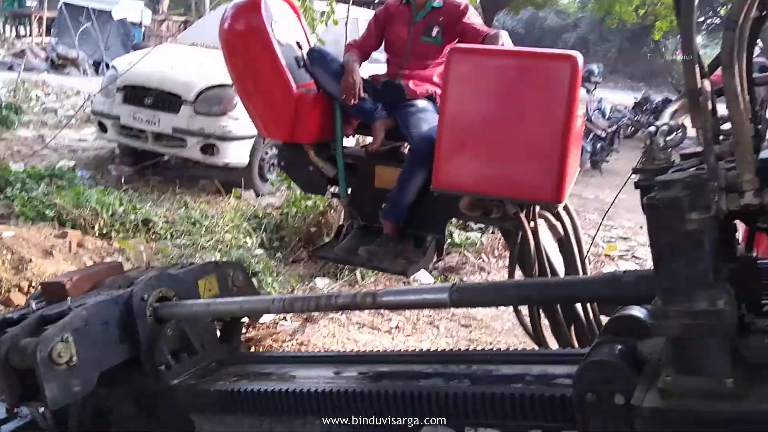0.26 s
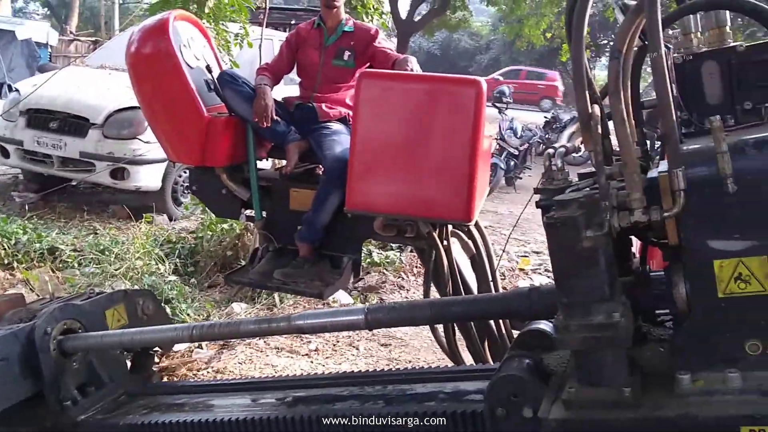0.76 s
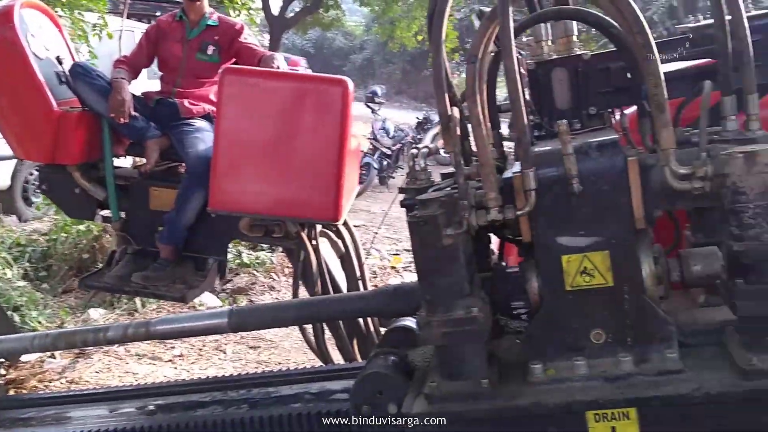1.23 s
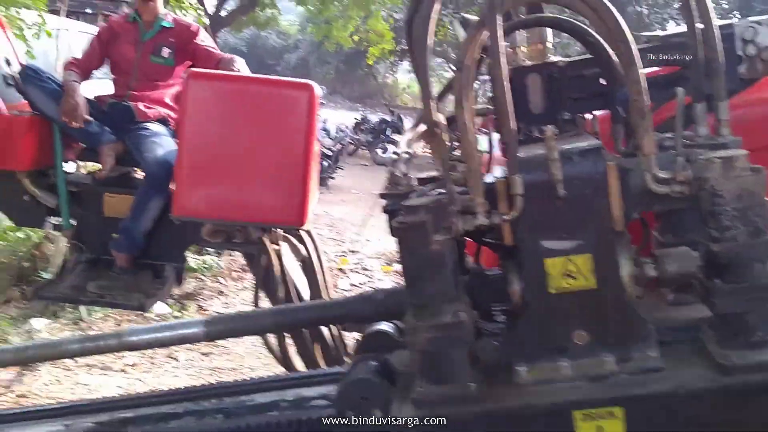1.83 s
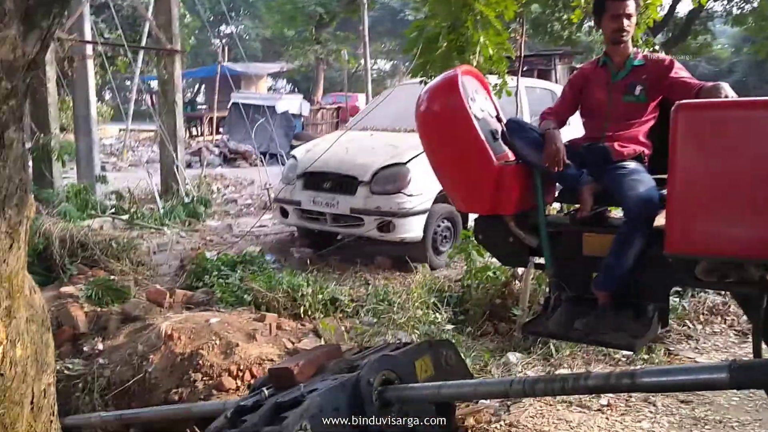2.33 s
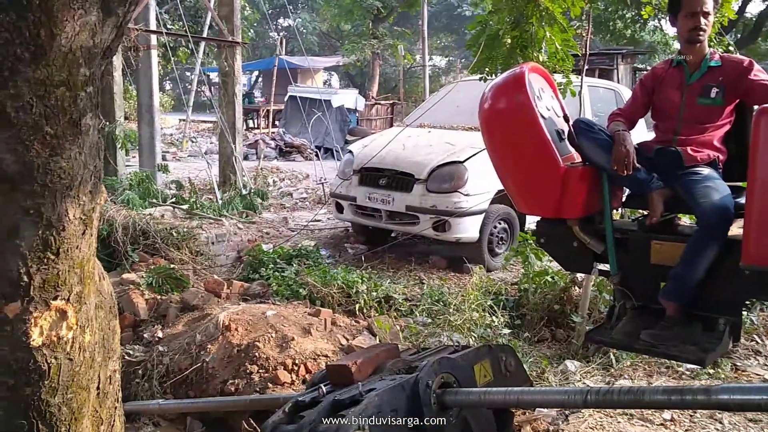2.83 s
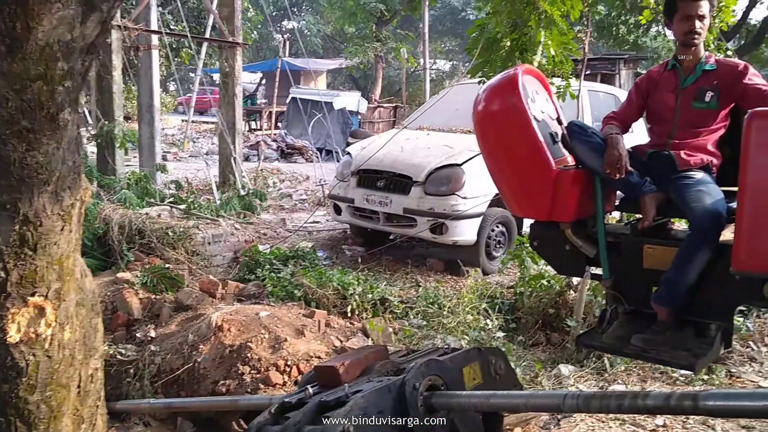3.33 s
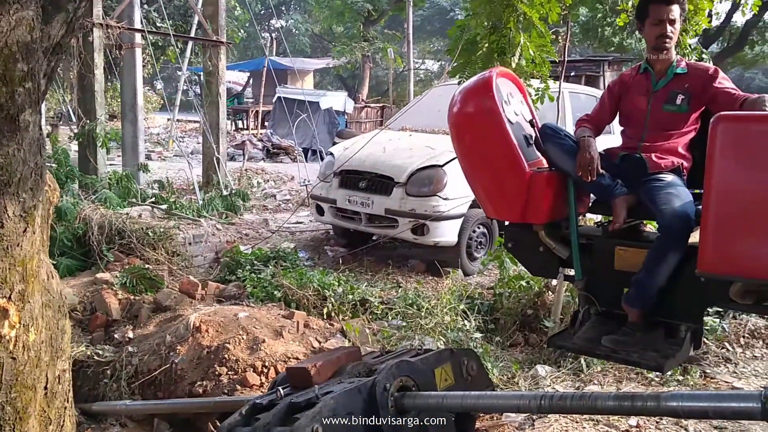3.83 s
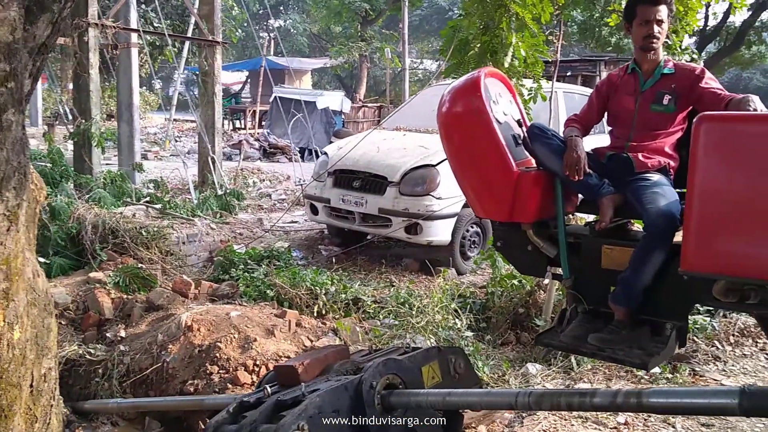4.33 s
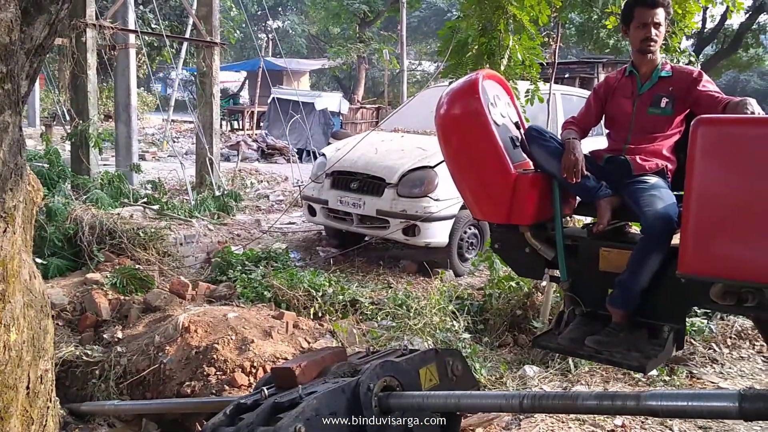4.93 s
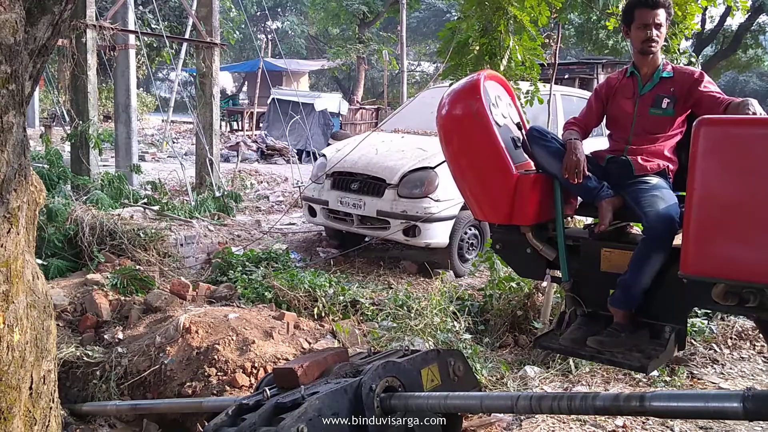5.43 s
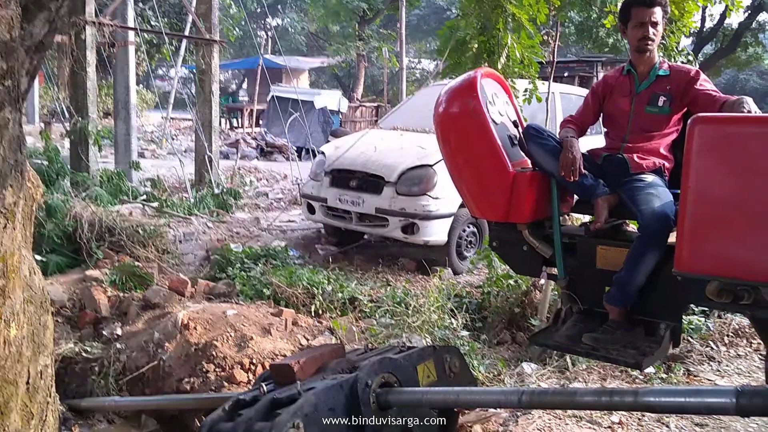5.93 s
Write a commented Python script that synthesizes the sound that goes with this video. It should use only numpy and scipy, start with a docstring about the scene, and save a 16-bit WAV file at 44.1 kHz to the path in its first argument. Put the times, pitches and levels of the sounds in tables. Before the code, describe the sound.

From 0 seconds a diesel drilling rig is running hard, close by and outdoors, and it continues without a break to about 6.2 seconds. A deep, fast-throbbing exhaust roar with uneven dips and swells carries low rumble and hydraulic pump hum. Above it are dense engine-block clatter, broad fluttering fan hiss and a thin gear whine that wavers roughly once a second. Loose steel rattles near 0.3 and 0.85 seconds. At about 2.0 to 2.3 seconds the handheld stereo microphone swings away, making the roar a little softer and shifting the hiss and whine in colour. Metallic buzzing and jolts gather around 2.7 to 3.3, then at 3.7 and 3.9 seconds. Rough growls surge around 3.4 to 4.1, with the roar dipping between them. Lighter rattles follow at 5.2, a tiny knock at 5.7, and clatter and hiss strengthen slightly towards the end.

```python
"""Outdoors, close to a diesel drilling rig under load: noise shaped into exhaust roar, rumble, growl, block
clatter and fan hiss; sines for exhaust orders, a hydraulic pump hum and a gear whine that wavers with each turn
of the drill pipe; noise through resonances for loose steel rattling. A handheld camera with two microphone
ports faces the engine for about two seconds, then swings away for the rest; it subtracts each port, delayed,
from the other for width."""
import sys
import numpy as np
from scipy import signal
from scipy.fft import rfft, irfft, next_fast_len
from scipy.io import wavfile
from scipy.ndimage import uniform_filter1d, map_coordinates

SR = 44100
rng = np.random.default_rng(int(sys.argv[2]) if len(sys.argv) > 2 else 0)


def invert_db(level):
    """Linear amplitude ratio for a level in decibels (20 dB per decade), elementwise."""
    return 10 ** (np.asarray(level, dtype=float) / 20)


def transcribe(u):
    """Save the signal u as a 16-bit wav file named by the first command-line argument.

    u: samples, shape (n,) or (channels, n), limited to [-1, 1]; the rate is SR.
    q: integer samples, one column per channel.
    """
    v = np.clip(np.atleast_2d(u).T, -1, 1)
    q = np.round(v * 32767).astype(np.int16)
    wavfile.write(sys.argv[1], SR, q)


N = 272097  # length in samples

FIRING_HZ = 77.0  # mean firing rate of the engine
# Brief dips and swells of the roar. Each row: centre in seconds, change in dB, half length in seconds.
ROAR_LUMPS = [(0.13, -8.5, 0.075), (.26, 2, 0.4), (0.311, -12, 0.031), (0.64, 3, 0.11), (1.394, 4, 0.078),
              (1.515, -8, 0.13), (1.593, 6, 0.075), (1.706, -8, 0.082), (2.47, 3, 0.091), (2.98, -5, 0.11),
              (3.475, 8.5, 0.049), (3.58, -13, 0.13), (3.69, 3.5, 0.03), (3.862, -10, 0.044),
              (4.437, -5, 0.35), (4.613, 6.5, 0.1), (5.09, 2, 0.19), (5.41, -13, 0.041), (5.727, -7, 0.036)]
# Slow strain on the machine. Each row: time in seconds, change of block clatter in dB, change of hiss in dB.
MACHINE_STRAIN = [(0, -0.5, 0.5), (.7, -0.5, 0.5), (1.5, 0.5, -2.5), (2.2, 0, 0), (2.7, -1.5, -0.5),
                  (3.3, 0, 2), (3.7, -1, -0.5), (4, 1, 1), (5, 1, 1), (6.17, 2.5, 1.5)]


def unit(x):
    """Scaled to rms 1."""
    return x / np.sqrt(np.mean(x ** 2) + 1e-20)


def along(points, hz, axis=1):
    """One column of a table, interpolated over a log frequency axis."""
    table = np.transpose(points)
    return np.interp(np.log(hz + 1), np.log(table[0] + 1), table[axis])


def curves(rows):
    """One value per sample for each column after the time."""
    s, *cols = np.transpose(rows)
    return [np.interp(np.arange(N) / SR, s, c) for c in cols]


def humps(table):
    """Sum of brief triangular changes of level, in dB."""
    t = np.arange(N) / SR
    return sum(db * np.clip(1 - abs(t - s) / half, 0, 1) for s, db, half in table)


def wobble(rate):
    """A smooth random curve with `rate` knots a second."""
    return map_coordinates(rng.standard_normal(int(N * rate / SR) + 4), [np.arange(N) * rate / SR])


def filtered(x, response):
    """x shaped by a complex response of frequency."""
    m = next_fast_len(N + 8192)
    return irfft(rfft(x, m) * response(np.fft.rfftfreq(m, 1 / SR)), m)[..., :N]


def delay(hz, ms):
    """Phase ramp of a lag."""
    return np.exp(-2j * np.pi * hz * ms / 1000)


def heading(facing, away):
    """Blends a quantity from its value facing the engine to its value turned away, as the camera swings."""
    # Each row: time in seconds, share turned away from 0 to 1.
    camera_swing = [(0, 0.27), (2.0, 0.13), (2.3, 0.91), (6.2, 0.96)]
    turn, = curves(camera_swing)
    return facing + turn * (away - facing)


def rush(spectrum, patchy_db):
    """Two unrelated noises with shared patches of gain, coloured for each camera heading."""
    z = signal.stft(rng.standard_normal((2, N)), nperseg=512)[2]
    field = rng.standard_normal(z.shape[1:])
    field = uniform_filter1d(field, size=4, axis=0)
    field = uniform_filter1d(field, size=8, axis=1)
    pair = signal.istft(z * invert_db(patchy_db * unit(field)), nperseg=512)[1][:, :N]
    facing = filtered(pair, lambda hz: invert_db(along(spectrum, hz)))
    away = filtered(pair, lambda hz: invert_db(along(spectrum, hz, axis=-1)))  # the last column
    return heading(unit(facing), unit(away))


def tones(cycles, table, fade_db, rate, slip=0, swells=()):
    """Overtones of one rotation, each fading and slipping on its own; phase slips grow with the multiple."""
    total = 0
    for multiple, facing_db, away_db in table:
        fade = fade_db * min(multiple / 2, 1) * wobble(rate)
        swell = humps([row[1:] for row in swells if row[0] == multiple])
        phase = multiple * (cycles + slip * wobble(rate)) + rng.random()
        level = invert_db(heading(facing_db, away_db) + fade + swell)
        total = total + level * np.sqrt(2) * np.sin(2 * np.pi * phase)  # level is rms
    return total


def at_ports(pair, facing_ms, away_ms):
    """The right port hears the left port's sound after a lag, plus a share of its own scattered sound."""
    # Each row: frequency in Hz, likeness of the ports from 0 to 1, right over left in dB, added lag in ms.
    port_likeness = [(80, .98, .5, .26), (120, .95, 0, 0), (230, .94, -2, 0), (340, .96, 0, 0),
                     (420, .95, 2, .04), (500, .92, 5, .1), (600, .8, 2, 0), (720, .75, -.5, 0),
                     (850, .55, 0, 0), (1300, .78, .5, 0), (1500, .7, 2, 0), (1900, .35, -2.5, 0),
                     (2700, .3, 1.5, 0), (5000, .25, 0, 0), (15000, .1, 0, 0)]

    def heard(ms):
        def response(hz):
            alike = np.clip(along(port_likeness, hz), 0, 1)
            shared = alike * delay(hz, ms + along(port_likeness, hz, axis=3))
            own = np.sqrt(1 - alike ** 2)
            return invert_db(along(port_likeness, hz, axis=2)) * np.array([shared, own])
        return filtered(pair, response).sum(0)

    return np.array([pair[0], heading(heard(facing_ms), heard(away_ms))])


def gear_rate():
    """Gear tooth rate in Hz: the teeth speed up and slow down once per turn of the drill pipe."""
    mean_hz, waver_hz = 308.3, 1.8
    pipe_turn_s, fastest_s = 1.045, 0.335  # length of one turn, first fastest moment
    return mean_hz + waver_hz * np.cos(2 * np.pi * (np.arange(N) / SR - fastest_s) / pipe_turn_s)


def flutter():
    """An uneven beat near the firing rate."""
    return np.cos(2 * np.pi * np.cumsum(FIRING_HZ * (1.04 + .06 * wobble(12))) / SR)


def fan():
    """Fan and oil hiss, noise that flutters near the firing rate and ripples faintly at the tooth rate."""
    # Each row: frequency in Hz, relative dB per Hz facing, the same turned away.
    hiss_spectrum = [(1280, -4, -3.5), (2080, 5.5, 2), (2090, -17, -7.5), (2420, 0, 3.5), (2540, 5.5, 1.5),
                     (3100, 2, 0), (3220, 1.5, -5), (4195, 2, -2), (4170, -7, -13), (4340, 4.5, -6),
                     (4390, 8, -7), (4460, 2, -0.5), (6700, 0, -0.5), (6830, -3.5, -4.5), (8170, -4, -4.5),
                     (8800, -8.5, -12), (11200, -17, -15), (12500, -25, -24)]
    # Highest treble, unrelated at the two ports. Each row: frequency in Hz, relative dB per Hz.
    air_spectrum = [(8000, -34), (10500, 0), (12500, -6), (14000, -12), (15500, -11)]
    strain_db = curves(MACHINE_STRAIN)[1]
    ripple = np.cos(2 * np.pi * np.cumsum(gear_rate()) / SR)
    swell_db = 0.55 * flutter() + 0.19 * ripple + 1.0 * wobble(21.07)
    hiss_db = heading(-33.5, -34.5) + 0.04 * humps(ROAR_LUMPS) + strain_db + swell_db
    hiss = invert_db(hiss_db) * rush(hiss_spectrum, patchy_db=2.04)
    air_db = heading(-56, -65) + 2 * strain_db + swell_db
    air = invert_db(air_db) * rush(air_spectrum, patchy_db=4.0)
    return at_ports(hiss, 0.26, 0.434) + air


def rattle():
    """Loose steel buzzes in a nearly regular shake; harder jolts spray contacts into the same resonances."""
    # Harder jolts. Each row: start in seconds, strength in dB before the envelope and flutter.
    jolts = [(0.2778, -22), (0.845, -23), (2.9178, -23), (3.1178, -23), (3.1757, -21), (3.254, -35),
             (3.6815, -22), (3.903, -20), (4.1545, -43), (5.24, -27), (5.8386, -42)]
    # Buzz. Each row: time in seconds, strength in dB before shake and flutter.
    shake_strength = [(0.0, -53), (1.75, -66), (2.27, -51), (2.45, -69), (2.7, -43.5), (3.3, -52),
                      (3.75, -52), (3.95, -58), (6.17, -56)]
    # Resonances of the steel. Each row: centre in Hz, width in Hz, relative peak in dB.
    steel_modes = [(5770, 90, 6), (6330, 200, -3), (7300, 350, -1), (7750, 250, -2), (8350, 500, -6)]
    shake_hz = 11.8
    strength, t = np.zeros(N + SR), np.arange(SR // 4) / SR
    for s, db in jolts:
        # falls 60 dB in 34 ms, behind a 14 ms rise
        strength[round(s * SR):][:len(t)] += invert_db(db - 60 * t / 0.034) * (1 - np.exp(-t / 0.014))
    shake = np.cos(2 * np.pi * (shake_hz * np.arange(N) / SR + .3 + .06 * wobble(1.5)))
    buzz = invert_db(curves(shake_strength)[0] + 5 * shake + 1.5 * wobble(6))

    def steel(f):
        ring = 0
        for k, (centre, width, db) in enumerate(steel_modes):
            mode = 1j * f * width / (centre * centre - f * f + 1j * f * width)
            ring = ring + (-1) ** k * invert_db(db) * mode  # neighbours in opposite sign
        return ring / (1 + (f / 9800) ** 8) / (1 + (5100 / (f + 1)) ** 8)  # fades above and below

    grain = strength[:N] * invert_db(9.7 * flutter()) + buzz * invert_db(3.4 * flutter())
    contacts = grain * rng.standard_normal((2, N))
    return filtered(contacts, steel) / np.std(filtered(rng.standard_normal(N), steel))


def hydraulics():
    """Pump piston hum as wavering overtones; the gear whine follows the pipe's uneven turning."""
    # Each row: multiple of the pump rate, dB facing, dB turned away.
    pump_overtones = [(1, -36.5, -38.5), (2, -28, -27), (3, -50.5, -46)]
    # Each row: multiple of the tooth rate, dB facing, dB turned away.
    whine_overtones = [(4, -50, -54), (8, -60, -52), (10, -57, -54), (11, -50.5, -57), (12, -41, -54),
                       (13, -56, -46), (15, -51, -44), (16, -59, -42), (17, -53, -51), (18, -55, -54),
                       (19, -59, -57), (20, -60, -58)]
    # Single overtones swell or fade. Each row: multiple, centre in seconds, change in dB, half length in seconds.
    whine_swells = [(11, .8, 5, .6), (11, 1.45, -6, .25), (11, 2.1, 7, .35), (11, 6.1, 4, .3),
                    (12, .6, 3, .4), (12, 4.8, 5, 1.2), (12, 5.7, 3, .5), (13, 3, -2, .6),
                    (13, 4.5, 5, .45), (13, 5.55, 5, .5), (16, .25, 13, .5), (16, 5.2, 2, 1.5),
                    (18, 2.3, 5, .3)]
    # Right port behind left. Each row: frequency in Hz, lag in ms facing, lag in ms turned away.
    whine_lag = [(3800, .23, .27), (3950, .39, .354), (4550, .4, .4), (4680, .4, .4), (4880, .32, .36)]
    pump_hz = 168.4
    strokes = np.cumsum(pump_hz * (1 + .004 * wobble(3))) / SR
    hum = tones(strokes, pump_overtones, fade_db=3.5, rate=18, slip=.05)
    hum = hum * invert_db(0.56 * humps(ROAR_LUMPS))
    teeth = np.cumsum(gear_rate() * (1 + .0016 * wobble(20))) / SR
    whine = tones(teeth, whine_overtones, fade_db=1.8, rate=25, slip=.004, swells=whine_swells)

    def late(axis):
        return filtered(whine, lambda hz: delay(hz, along(whine_lag, hz, axis)))

    right = heading(late(axis=1), invert_db(-7.5) * late(axis=2))  # once turned, the camera body shades the right port
    return at_ports(np.array([hum, 0 * hum]), 0.14, 0.087) + np.array([whine, right])


def engine():
    """Firing orders, a roar puffed once a crank turn in uneven bursts, low rumble, growl, a knock, clatter."""
    # Exhaust tones. Each row: multiple of the firing rate, dB facing, dB turned away.
    exhaust_orders = [(1, -41.5, -39.5), (2, -45, -41), (3, -27.5, -36), (3.5, -38, -28), (4, -47, -44),
                      (5, -34.5, -35), (6, -49.5, -44), (8, -53, -47)]
    # Each row: frequency in Hz, relative dB per Hz; likewise for rumble and growl.
    roar_spectrum = [(150, -27.5), (200, -2), (270, 10.5), (350, 5), (450, -5), (530, -13.5), (570, -35),
                     (800, -67)]
    rumble_spectrum = [(25, -32), (45, -21), (70, -1), (120, -1.5), (165, 16), (200, 9), (260, -17),
                       (400, -80)]
    growl_spectrum = [(400, -32), (470, -35), (510, 5.5), (560, -2.5), (620, 4.5), (700, -7.5), (780, -2),
                      (900, -38.5)]
    # Block clatter. Each row: frequency in Hz, relative dB per Hz facing, the same turned away.
    block_spectrum = [(310, -12, -8), (435.6, 0, 9.5), (458, -6, -31), (497, -1.5, 1.5), (535, -11, -3.5),
                      (718, 5.5, 2.5), (823, -6, -4.5), (1147, 0, -2), (1188, 3.5, 2.5), (1233, 0, -6),
                      (1510, -7, -4), (1610, -10, -11), (2460, -34, -23.5), (3550, -61, -36)]
    # Low rumble. Each row: time in seconds, strength in dB before a fixed 2 dB cut.
    rumble_strength = [(0.0, -34), (0.55, -34), (0.67, -22.5), (0.81, -33.5), (2.37, -32.5), (2.4, -22),
                       (2.8, -45), (3.99, -38), (4.19, -22.5), (4.29, -46), (4.73, -30), (4.95, -45),
                       (5.17, -31.5), (6.05, -36.5), (6.12, -23), (6.17, -44)]
    # The engine growls up; the very short row at 5.698 s is a knock.
    # Each row: centre in seconds, rise in dB, half length in seconds.
    growl_rises = [(.2, 10.5, 0.52), (2.85, 10, 0.061), (3.35, 7, 0.1), (3.46, 14, 0.052),
                   (3.69, 16.5, 0.088), (3.77, 11, 0.022), (3.98, 13, 0.15), (4.12, 6, 0.12),
                   (4.5, 10.5, 0.086), (5.1, 9.5, 0.11), (5.33, 10, 0.039), (5.698, 22, 0.0044),
                   (5.76, 13.5, 0.057), (5.93, 12, 0.19)]
    lumps_db = humps(ROAR_LUMPS)
    bursts = 1.0 * wobble(38) + .9 * wobble(14)  # uneven combustion, dB
    firings = np.cumsum(FIRING_HZ * (1 + 0.005 * wobble(4))) / SR
    crank = np.cos(np.pi * firings)  # one turn every two firings

    roar_db = heading(-20.5, -23) + lumps_db + 2.6 * crank + bursts
    roar = invert_db(roar_db) * rush(roar_spectrum, patchy_db=1.5)
    rumble_db = curves(rumble_strength)[0] - 2.0 + 0.85 * bursts + 0.48 * wobble(8.3)
    rumble = invert_db(rumble_db) * rush(rumble_spectrum, patchy_db=1.0)
    growl_db = -43.5 + humps(growl_rises) + 2.2 * crank + .6 * bursts
    growl = invert_db(growl_db) * rush(growl_spectrum, patchy_db=2.2)
    block_db = heading(-31.5, -30.5) + 0.11 * lumps_db + curves(MACHINE_STRAIN)[0] + 0.6 * wobble(6)
    block_db = block_db + 0.14 * crank + 0.23 * np.cos(2 * np.pi * firings)
    block = invert_db(block_db) * rush(block_spectrum, patchy_db=1.5)
    orders = tones(firings, exhaust_orders, fade_db=3.2, rate=18, slip=.03)
    orders = orders * invert_db(0.4 * lumps_db + 0.22 * bursts)
    low = roar + rumble + np.array([orders, 0 * orders])
    return at_ports(low, 0.064, 0.15) + at_ports(growl, 0.42, 0.11) + at_ports(block, 0.31, 0.39)


def scene():
    """Sound at the left and right ports."""
    return fan() + rattle() + hydraulics() + engine()


def low_pass(x):
    """Removes everything above the highest recorded frequency."""
    return signal.sosfilt(signal.butter(12, 15360, fs=SR, output="sos"), x)


def record(dry):
    """Delayed cross-subtraction widens the stereo; channels differ in gain and by a lag that grows with pitch."""
    # Each row: frequency in Hz, share of the other port subtracted from 0 to 1.
    crossfeed = [(100, .85), (1100, .92), (2000, .97), (2500, .98), (3400, .9), (4500, .88), (6000, .62),
                 (8000, .45), (11000, .15), (13000, 0)]
    # Each row: frequency in Hz, left over right in dB.
    channel_balance = [(30, 0), (80, 2), (150, 2.6), (300, 2.3), (600, .3), (1150, .5), (1600, .3),
                       (2250, -.3), (3300, -2.5), (4500, -3), (6000, -3.5), (12000, -3.2)]
    wide = dry - filtered(dry[::-1], lambda hz: np.clip(along(crossfeed, hz), 0, 1) * delay(hz, ms=.44))

    def channels(hz):
        tilt = invert_db(along(channel_balance, hz) / 2)  # half up on the left, half down on the right
        return np.array([tilt + 0j, delay(hz, ms=.023 * hz / 8000) / tilt])

    wide = filtered(wide, channels)
    return low_pass(wide)


dry = scene()
out = record(dry)
transcribe(out)
```